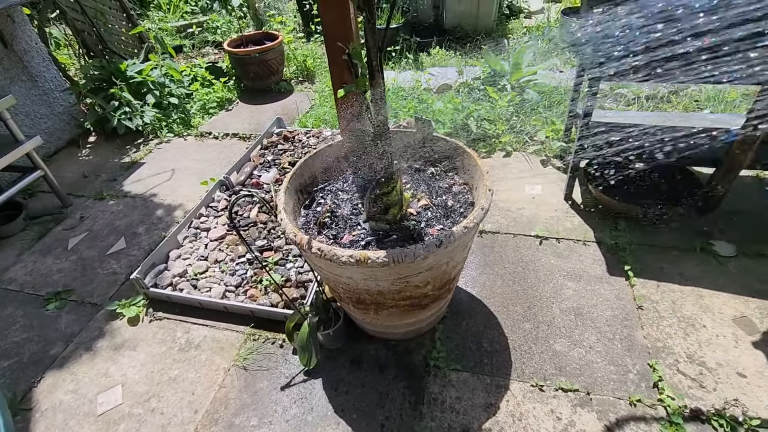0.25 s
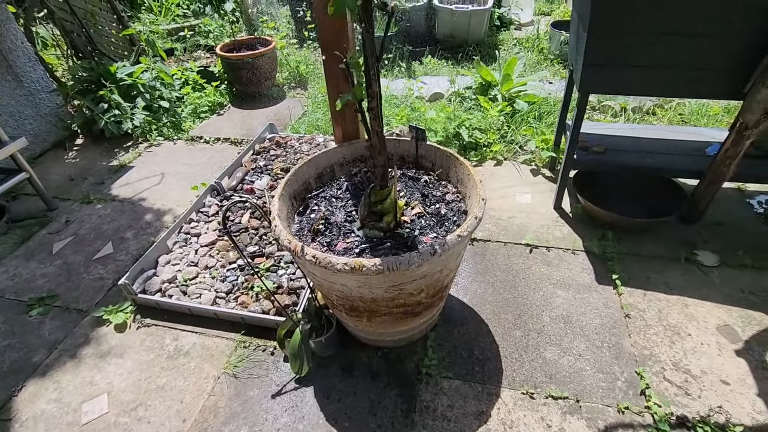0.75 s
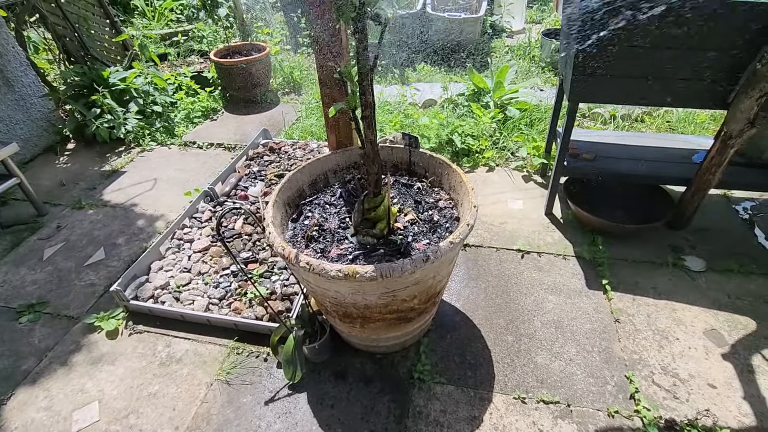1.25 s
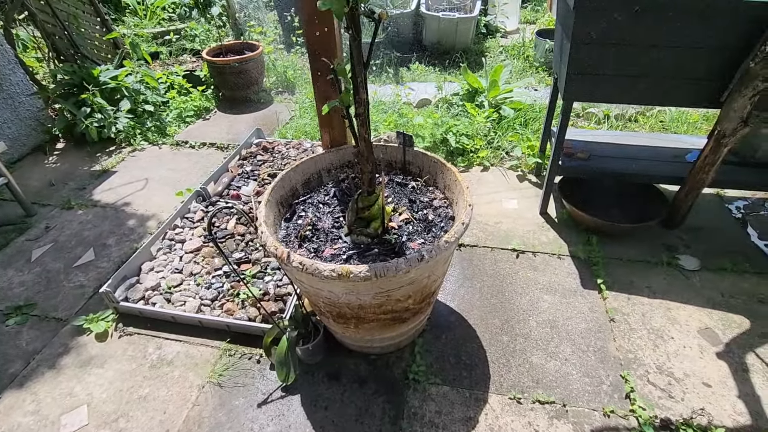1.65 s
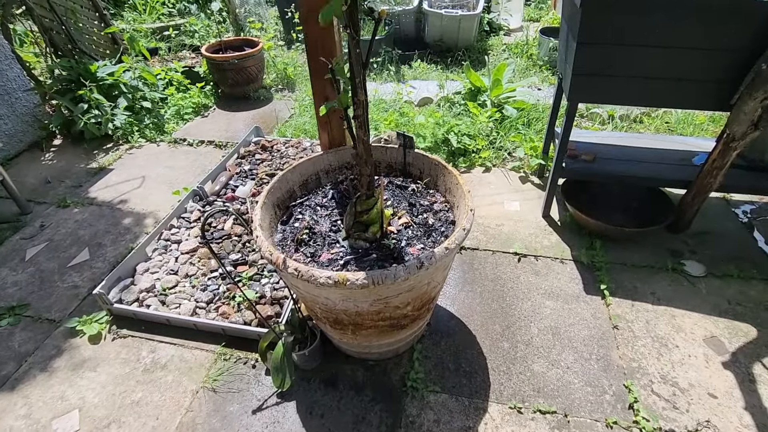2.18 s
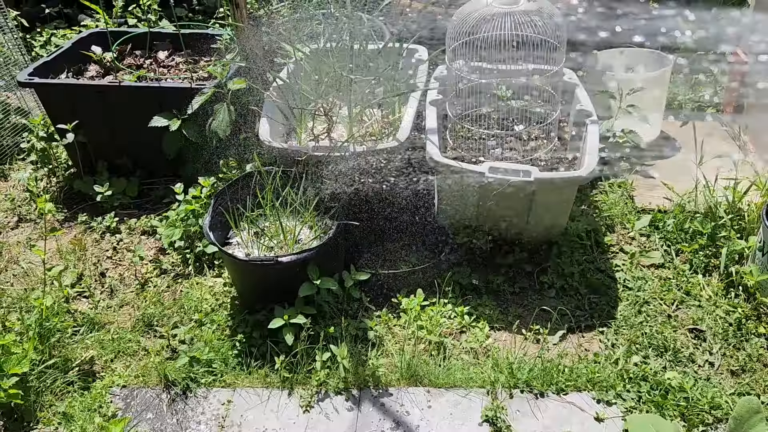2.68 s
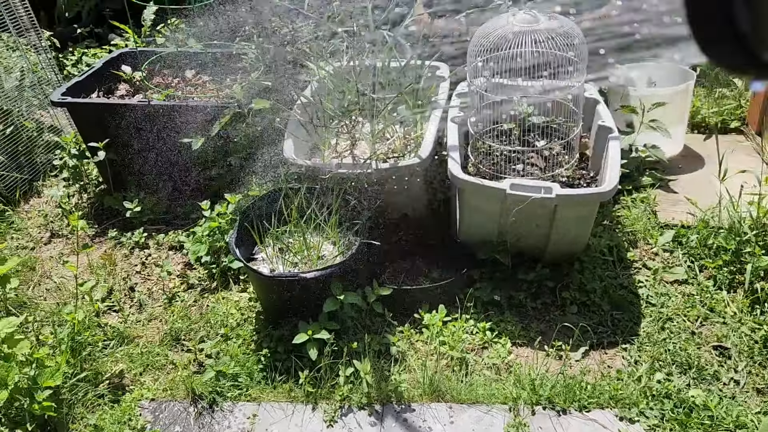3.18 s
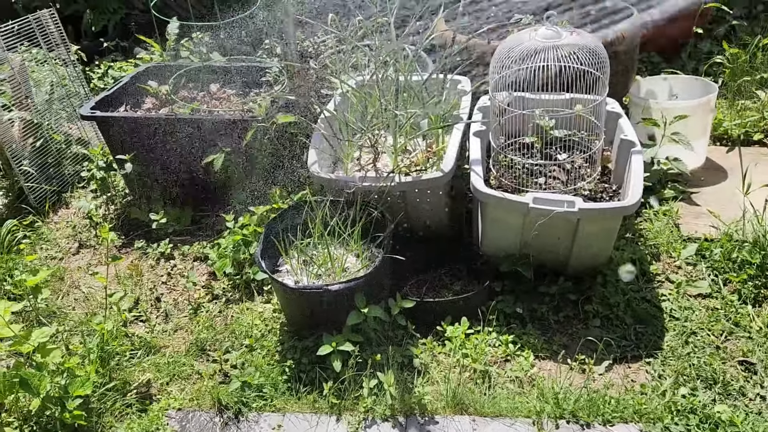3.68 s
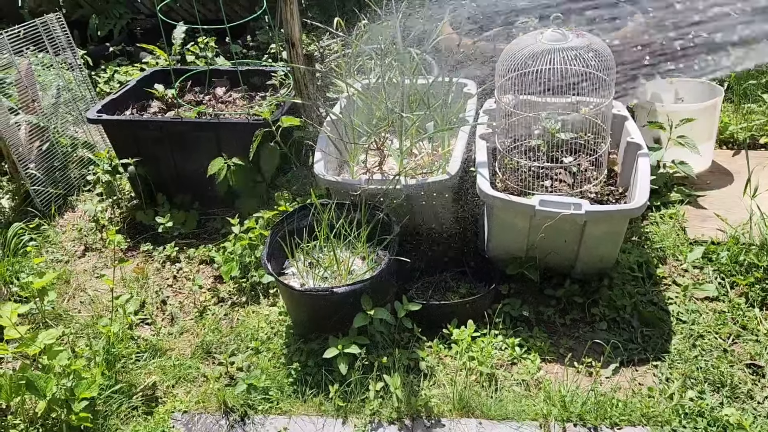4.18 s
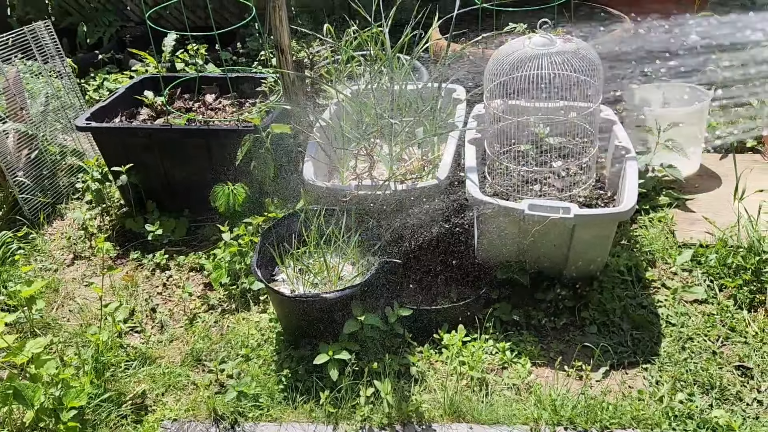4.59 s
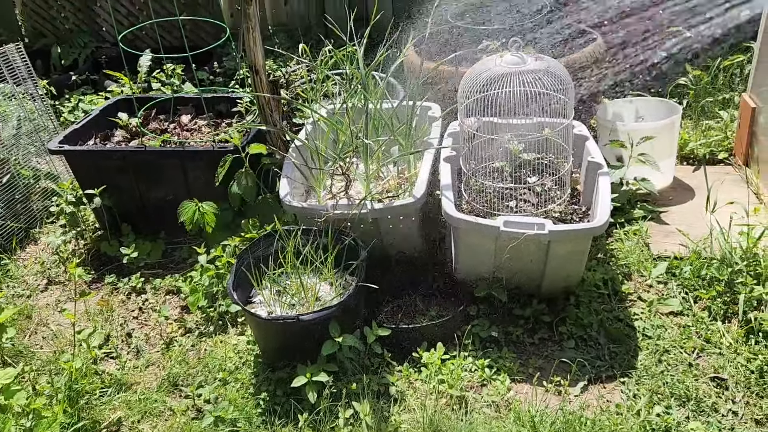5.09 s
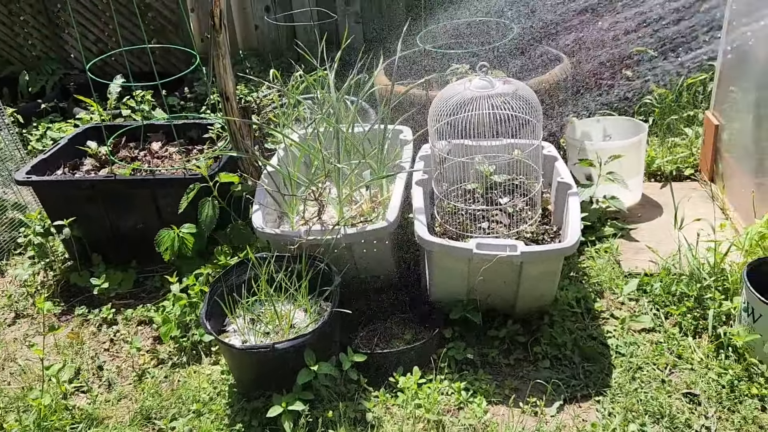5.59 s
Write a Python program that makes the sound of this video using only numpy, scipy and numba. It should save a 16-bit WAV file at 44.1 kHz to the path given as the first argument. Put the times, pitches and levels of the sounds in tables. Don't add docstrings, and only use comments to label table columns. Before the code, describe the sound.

Outdoors in a backyard, a dense, slightly ringing water jet sprays from a nozzle near the microphones, stronger on the right. It sputters, then stops with a sharp click, a short closing hiss and a dull handling knock, leaving sparse high drips over low distant rumble. A hard cut through silence leads to a second steady spray, brighter and fuller, with its colour gently wavering until it ends abruptly.

```python
import sys
import numpy as np
from scipy import signal
from scipy.fft import rfft, irfft
from scipy.io import wavfile
from scipy.ndimage import map_coordinates
from numba import njit

SR = 44100
rng = np.random.default_rng(int(sys.argv[2]) if len(sys.argv) > 2 else 0)


def file_out(sig):
    cols = np.atleast_2d(sig).T
    lim = np.clip(cols, -1, 1)
    pcm = np.round(lim * 32767).astype(np.int16)
    wavfile.write(sys.argv[1], SR, pcm)


def decibels_to_gain(level_db):
    exponent = np.asarray(level_db, float) / 20
    return 10 ** exponent


N = 257984
T = np.arange(N) / SR
SPLICE_START_S, SPLICE_END_S = 2.5087, 2.5586


def rms_one(x):
    return x / np.sqrt(np.mean(x ** 2, axis=-1, keepdims=True) + 1e-20)


def in_time(rows):
    s, *columns = np.transpose(rows)
    return [np.interp(T, s, c) for c in columns]


def by_shot(first, second):
    return np.where(T < SPLICE_START_S, first, second)


def drift(rate_hz):
    r = np.exp(-40 * np.pi * rate_hz / SR)
    noise = rng.standard_normal(N // 20 + 4002)
    slow = signal.lfilter([1], [1, -2 * r, r * r], noise)[4000:]
    return np.interp(np.arange(N) / 20, np.arange(len(slow)), rms_one(slow))


def delayed(x, delay_ms, order):
    return map_coordinates(x, [np.arange(N) - delay_ms * SR / 1000], order=order)


def band(x, low_hz, high_hz, order=2):
    edges_hz = [low_hz, min(high_hz, .45 * SR)]
    return signal.sosfilt(signal.butter(order, edges_hz, "band", fs=SR, output="sos"), x)


def peaks(x, modes):
    for hz, width_hz, db in modes:
        a, w = decibels_to_gain(db / 2), 2 * np.pi * hz / SR
        k = np.sin(w) * width_hz / hz / 2
        middle = -2 * np.cos(w)
        x = signal.lfilter([1 + k * a, middle, 1 - k * a], [1 + k / a, middle, 1 - k / a], x)
    return x


@njit
def glide(x, cosine, r):
    y = np.zeros(len(x))
    for i in range(2, len(x)):
        y[i] = x[i] - x[i - 2] + 2 * r * cosine[i] * y[i - 1] - r * r * y[i - 2]
    return y


def resonance(x, hz, width_hz):
    return rms_one(glide(x, np.cos(2 * np.pi * hz / SR), np.exp(-np.pi * width_hz / SR)))


def coloured(points, likeness):
    log_hz = np.log(np.arange(N // 2 + 1) * SR / N + 1)
    at_hz, level_db = np.transpose(points)
    alike_hz, alike = np.transpose(likeness)
    alike = np.clip(np.interp(log_hz, np.log(alike_hz), alike), 0, 1)
    gain = decibels_to_gain(np.interp(log_hz, np.log(at_hz), level_db))
    mid, side = rfft(rng.standard_normal((2, N)))
    both = np.sqrt(1 + alike) * mid + np.sqrt(1 - alike) * side * [[1], [-1]]
    return rms_one(irfft(gain * both, N))


def yard():
    # t/s, level above rumble/dB, half length/s
    gusts = [(0.997, 7, 0.048), (1.42, 5, 0.12), (1.837, 8, 0.21), (2.117, 3.5, .05), (2.306, 6.5, 0.086),
             (2.82, 2, .2), (4.326, 8, 0.096), (4.57, 4.5, 0.072), (5.384, 7.5, 0.038), (5.755, 3.5, 0.15)]
    # f/Hz, density/dB per Hz
    rumble_colour = [(20, -16), (35, -1.5), (55, 3.5), (100, -2.5), (140, -10.5), (200, -23), (300, -23),
                     (500, -42)]
    # f/Hz, density/dB per Hz
    floor_colour = [(100, 10), (200, 2), (400, -3), (800, -1.5), (1300, -8.5), (2500, -10), (5000, -21.5),
                    (9000, -31), (15000, -49)]
    # f/Hz, left-right likeness [0..1]
    floor_likeness = [(100, 1), (300, 0.92), (800, 0.065), (2000, 0), (8000, 0.26)]
    gust_db = sum(db * np.exp(-((T - s) / half_s) ** 2) for s, db, half_s in gusts)
    rumble_db = by_shot(-46.5, -45.5) + gust_db + 1.1
    rumble = decibels_to_gain(rumble_db) * coloured(rumble_colour, [(25, .8), (80, .72), (125, .75)])
    return rumble + decibels_to_gain(by_shot(-46.5, -47.5)) * coloured(floor_colour, floor_likeness)


def motors():
    # start/s, end/s, f/Hz, level/dB
    hums = [(0, 2.52, 119.5, -46), (0, 2.52, 157, -52.5), (0, 2.52, 135, -60), (2.55, 5.85, 227, -61),
            (2.8, 3.6, 161.5, -59), (2.8, 3.5, 323, -63), (3.5, 5.85, 106, -47), (5.1, 5.6, 285, -62),
            (2.55, 5.85, 54, -55), (2.55, 3.5, 128, -56)]
    out = np.zeros(N)
    for start_s, end_s, hz, db in hums:
        on = np.clip(np.minimum(T - start_s, end_s - T) / 0.15 + .5, 0, 1)
        level = decibels_to_gain(db + 3 + 2.5 * drift(6))
        out += on * level * np.sin(2 * np.pi * np.cumsum(hz + 1.5 * drift(8)) / SR)
    return out


def knocks():
    # t/s, peak/dB, f/Hz, t60/s
    bumps = [
        (1.774, -26, 213, 0.014),
        (1.888, -23.5, 72.4, 0.11),
        (4.3, -27.5, 60.5, 0.11),
    ]
    out = np.zeros(N)
    for s, db, hz, t60_s in bumps:
        t = np.maximum(T - s, 0)
        out += decibels_to_gain(db - 60 * t / t60_s) * np.sin(2 * np.pi * hz * t)
    return out


def ticks():
    # t/s, peak/dB, f/Hz, left-right/dB, tail/dB
    clicks = [(1.6185, -16, 4400, -11, -37), (1.6194, -24, 3450, 7, -40), (1.618, -20, 7060, 0, -40),
              (1.67, -30, 11500, 4, -30), (1.619, -20, 13600, -2, -40), (2.0802, -35, 14100, -6, -25),
              (2.208, -39, 8000, 3, -30), (2.2254, -32, 12000, 0, -49), (2.241, -39, 7040, -6, -19),
              (2.2655, -18.5, 11780, 9, -18), (2.2657, -35.5, 5500, -12, -8), (2.2785, -26, 11300, 3, -16),
              (2.2785, -43, 5900, 3, -30), (2.305, -40, 14500, 0, -25), (2.348, -44, 13000, 0, -22),
              (2.389, -43, 13500, 0, -25), (2.401, -32, 13500, 5, -22), (2.4055, -32, 13200, 0, -25),
              (2.4082, -24, 13800, 2, -18), (2.419, -32, 14400, 1, -22), (2.422, -32, 12000, -3, -17),
              (2.49, -42, 13500, 0, -29)]
    # t/s, peak/dB, f/Hz
    spat = [(0.0956, -35, 4500), (0.2518, -32, 5800), (0.2897, -29, 5230), (0.3326, -26, 5430),
            (0.4657, -20, 5500), (0.5766, -25, 5330), (0.605, -39, 6240), (1.2588, -21, 7600),
            (1.3683, -28, 6330), (1.381, -23, 6000)]
    ring_t60_s, tail_t60_s, attack_s = 0.0026, 0.056, 0.000071
    out, t = np.zeros((2, N)), np.arange(SR // 10) / SR
    events = [*clicks] + [(s, db + 1, hz, -11, -30) for s, db, hz in spat]
    noise = rng.standard_normal((len(events), 2, len(t)))
    for (s, db, hz, pan_db, tail_db), fizz in zip(events, noise):
        envelope = decibels_to_gain(-60 * t / ring_t60_s) * (1 - np.exp(-t / attack_s))
        ring = np.sin(2 * np.pi * hz * t) * envelope * (1 + 0.49 * fizz)
        tail = rms_one(band(fizz, 1.14 * hz, 3.6 * hz)) * decibels_to_gain(tail_db - 60 * t / tail_t60_s)
        at = round(s * SR)
        out[:, at:at + len(t)] += decibels_to_gain(db + pan_db * np.array([[.5], [-.5]])) * (ring + tail)
    return out


def air_column(left_db):
    # t/s, f/Hz, level above jet/dB
    column_curve = [(0, 518, -4), (.8, 544, -9.5), (1.6, 557, -10), (1.8, 574, -13), (2.5, 570, -24),
                    (2.56, 595, -11.5), (3.4, 603, -13), (4.2, 643, -11.5), (5, 622, -12.5),
                    (5.85, 680, -7.5)]
    hz, db = in_time(column_curve)
    tone = resonance(rng.standard_normal(N), hz, width_hz=65)
    return decibels_to_gain(left_db + db + 2.2 * drift(1.9)) * tone * decibels_to_gain([[-.6], [.6]])


def controls():
    # t/s, left port lag/ms, aim at right port/dB, lobe centre/Hz
    aim = [(0, 0.46, -14, 5200), (.35, 0.39, 10, 6040), (.55, 0.36, -2, 6260), (.8, 0.29, 7.5, 7700),
           (1.05, 0.32, 10, 7000), (1.25, 0.38, 5, 6900), (1.5, 0.29, -25, 6100), (1.75, 0.39, 1, 6900),
           (2.0, 0.43, 0, 8050), (2.53, 0.36, 6, 6600), (3.1, 0.23, 2, 6640), (3.3, 0.23, 15.5, 6470),
           (3.52, 0.18, 17.5, 6750), (4.0, 0.26, 13, 6840), (4.35, 0.23, 8, 6240), (4.72, 0.28, 11, 6500),
           (5.27, 0.22, 16, 6930), (5.85, 0.26, 11.5, 6100)]
    # t/s, flow/dB, fineness of spray/dB
    flow = [(0, -38, -6), (.3, -37.5, -9), (.55, -37, -8.5), (.9, -41, -1.5), (1.22, -36.5, -3.5),
            (1.45, -39, -4.5), (1.62, -40.5, -7.5), (2.53, -37.5, -0.5), (2.8, -36, -4), (3.15, -35, -4),
            (3.45, -39, -4), (4.1, -39, -3.5), (4.5, -39.5, -5.5), (4.9, -39, -2.5), (5.3, -39, -6),
            (5.85, -41, -4)]
    # t/s, loss of flow/dB, hiss of closing valve/dB
    release = [(1.63, -0.5, -70), (1.7, -3, -54), (1.745, -17, -65), (1.762, -1.5, -40.5),
               (1.82, -15, -46.5), (2.035, -17, -50), (2.055, -35, -77), (2.3, -27, -73), (2.51, -30, -74)]
    lag_ms, aim_db, beam_hz = in_time(aim)
    flow_db, fine_db = in_time(flow)
    loss_db, valve_db = [by_shot(c, rest) for c, rest in zip(in_time(release), (0, -90))]
    shut = np.clip(-loss_db / 12, 0, 1)
    leaking = np.clip((valve_db + 63) / 15, 0, 1)
    panned = 1 - shut * (1 - leaking)

    def with_valve(db, more_db):
        return 10 * np.log10(decibels_to_gain(2 * db) + decibels_to_gain(2 * (valve_db + more_db)))

    jet_pan_db = (-4.37 - 20.5 * (lag_ms - .25)) * panned
    mist_pan_db = -66 * (lag_ms - .25) * panned
    right_db = flow_db + loss_db
    left_db = right_db + jet_pan_db
    beam_db = with_valve(right_db + aim_db - 6 * shut, 2.7)
    mist_db = with_valve(right_db + fine_db, -.1)
    return right_db, left_db, beam_db, beam_hz, mist_db, mist_pan_db, lag_ms


def water(sputter_db, ringing):
    # f/Hz, width/Hz, level/dB
    pipe_modes = [
        [(1400, 1000, -3), (2300, 700, 2), (3100, 500, 1), (3900, 400, -3), (4700, 500, 4), (5700, 600, 1)],
        [(2170, 550, 10.5), (3400, 650, 8), (4720, 400, 3.5), (6400, 600, 4), (10200, 1000, 3),
         (14500, 2000, 2)],
    ]
    drops_per_s, spread_db = 6000, 4
    sizes = decibels_to_gain(spread_db * np.minimum(rng.exponential(1, N), 5)) * rng.choice([-1, 1], N)
    drops = rms_one(sizes * (rng.random(N) < drops_per_s / SR))
    share = by_shot(0.61, 0.082)
    flow = np.sqrt(share) * drops + np.sqrt(1 - share) * rng.standard_normal(N)
    flow = flow * decibels_to_gain(sputter_db * drift(78))
    return by_shot(*[rms_one(ringing * peaks(flow, modes) + (1 - ringing) * flow) for modes in pipe_modes])


def with_echo(x, delay_ms, wander_ms, strength):
    return x + strength * delayed(x, np.maximum(delay_ms + wander_ms * drift(0.72), 0), order=3)


def spray():
    # delay/ms, wander/ms, strength
    hand_echo = [
        (.19, .025, .22),
        (.17, .025, .25),
    ]
    right_db, left_db, beam_db, beam_hz, mist_db, mist_pan_db, lag_ms = controls()
    jet = water(sputter_db=1.5, ringing=1)
    late = delayed(jet, lag_ms - .026, order=3)
    splash = water(sputter_db=1.5, ringing=0.61), water(sputter_db=0.8, ringing=0.43)

    def heard(share):
        return [np.sqrt(share) * j + np.sqrt(1 - share) * s for j, s in zip((late, jet), splash)]

    left, right = heard(by_shot(.45, .75))
    out = np.zeros((2, N))
    out[0] = decibels_to_gain(left_db + 6.0 + 2.05 * drift(9.4)) * rms_one(band(left, 960, 12700, order=1))
    out[1] = decibels_to_gain(right_db + 5.0 + 0.68 * drift(9.6)) * rms_one(band(right, 1020, 11600, order=1))
    beam_width_hz, lobe_left_db = 1700, -14
    centre_hz = beam_hz * (1 + 0.025 * drift(28))
    lobe = resonance(resonance(right, centre_hz, beam_width_hz), centre_hz, 2 * beam_width_hz)
    lobe = decibels_to_gain(beam_db - 14.0 + 0.24 * drift(45)) * lobe
    out[1] += lobe
    out[0] += decibels_to_gain(lobe_left_db) * delayed(lobe, lag_ms, order=1)
    mist = rms_one(band(np.array(heard(.45)), 8840, 21900))
    out += decibels_to_gain(mist_db + 6.5 + mist_pan_db * [[1], [0]] + 0.48 * drift(4.9)) * mist
    out = np.array([with_echo(x, *echo) for x, echo in zip(out, hand_echo)])
    return out + air_column(left_db)


def scene():
    return yard() + motors() + knocks() + ticks() + spray()


def band_limit(x):
    return signal.sosfilt(signal.butter(12, 16840, fs=SR, output="sos"), x)


def record(dry):
    # f/Hz, width/Hz, level/dB
    port_modes = [
        [(8050, 900, -6), (6500, 1600, 3)],
        [(9200, 1000, -3), (7750, 1100, 6), (5800, 3000, 3), (4650, 700, 3), (11000, 900, -2.5),
         (950, 600, -2.5)],
    ]
    ports = np.array([peaks(x, modes) for x, modes in zip(dry, port_modes)])
    ports = signal.sosfilt(signal.ellip(14, .5, 40, 15480, fs=SR, output="sos"), ports)
    fade = np.clip((SPLICE_START_S - T) / .0015, 0, 1)
    return band_limit(ports * np.where(T < SPLICE_END_S, fade, 1))


dry = scene()
out = record(dry)
file_out(out)
```